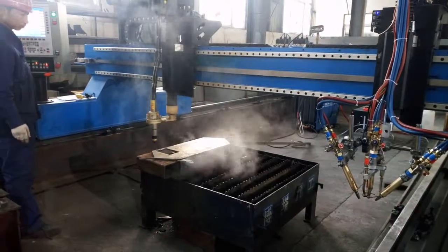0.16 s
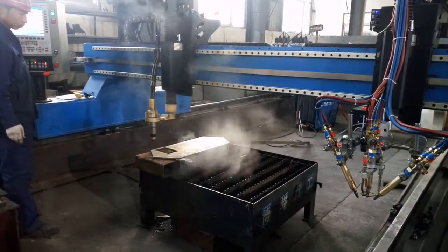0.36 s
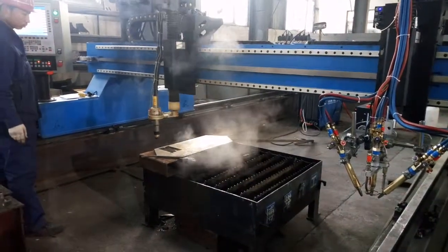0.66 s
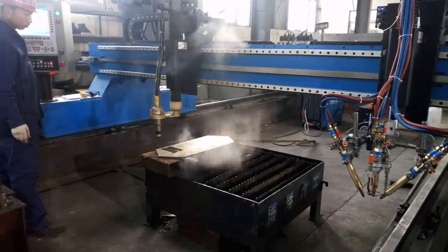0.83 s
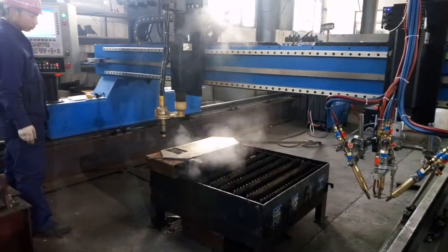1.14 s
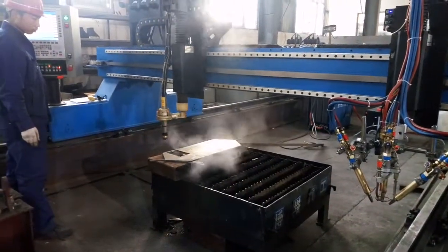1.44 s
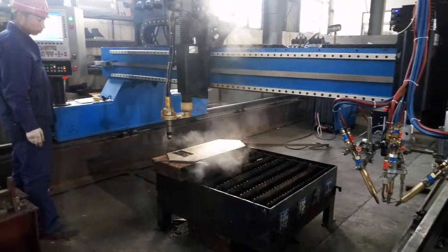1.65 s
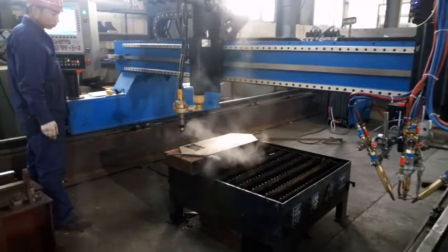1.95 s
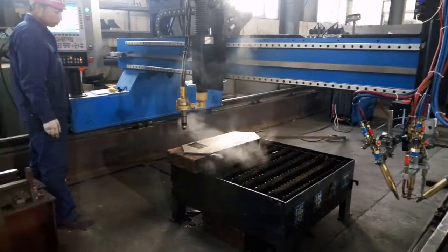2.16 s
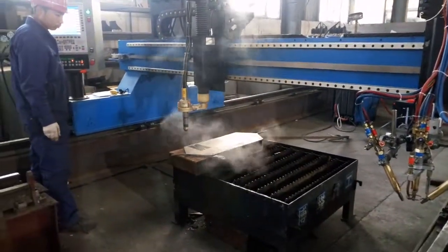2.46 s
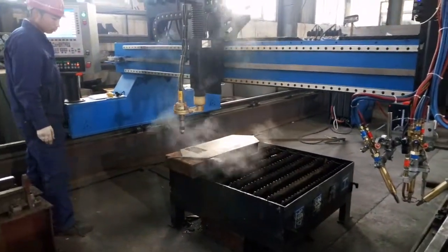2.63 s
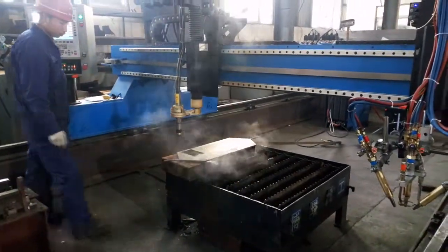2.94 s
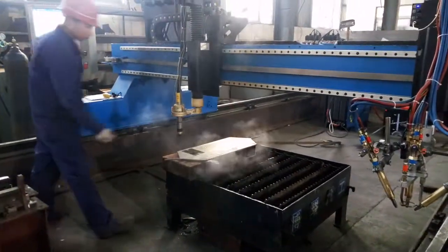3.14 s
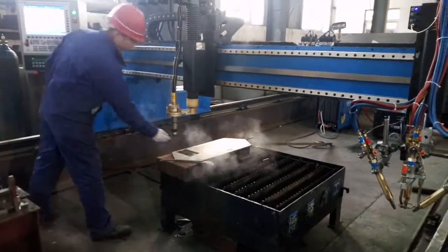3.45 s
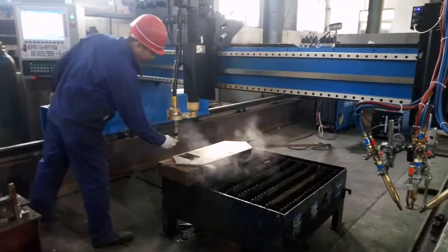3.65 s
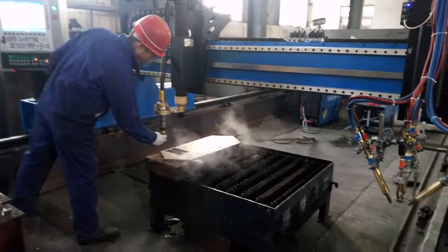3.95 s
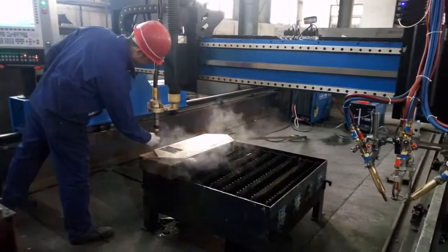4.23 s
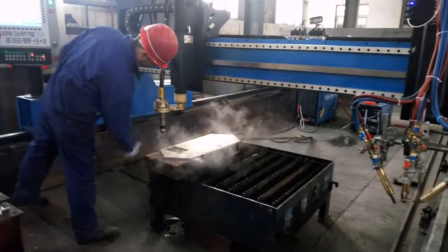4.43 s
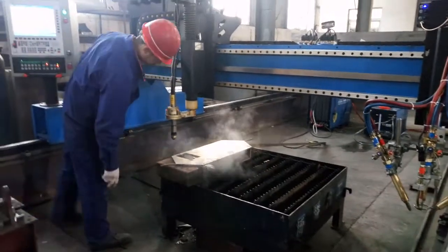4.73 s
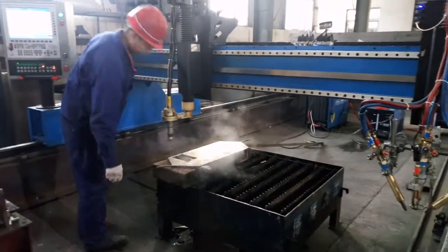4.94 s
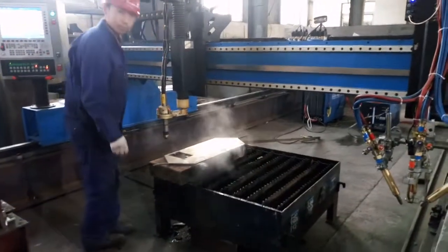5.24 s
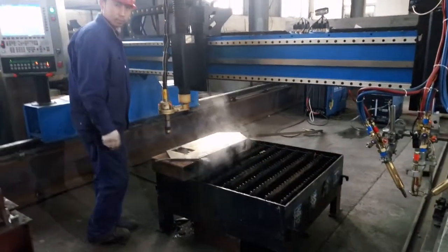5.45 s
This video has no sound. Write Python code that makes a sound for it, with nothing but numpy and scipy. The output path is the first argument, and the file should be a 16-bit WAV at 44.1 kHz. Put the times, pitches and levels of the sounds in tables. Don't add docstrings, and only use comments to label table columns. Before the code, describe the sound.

Harsh, high rushing jet over a metal plate fades out after four seconds, exposing a softer steady leak hiss and humming machinery.

```python
import sys
import numpy as np
from scipy import signal
from scipy.fft import rfft, irfft
from scipy.io import wavfile
from scipy.ndimage import map_coordinates

SR = 44100
rng = np.random.default_rng(int(sys.argv[2]) if len(sys.argv) > 2 else 0)


def dump(signal):
    limited = np.clip(np.atleast_2d(signal).T, -1, 1)
    pcm = np.round(limited * 32767).astype(np.int16)
    wavfile.write(sys.argv[1], SR, pcm)


def linear_from_db(decibels):
    return 10 ** (np.asarray(decibels, float) / 20)


N = 246517
T = np.arange(N) / SR
FRAME = 512
BAND_TOP_HZ, PATCH_OFFSET = 15510, 646
FULL_FLOW_DB = -11

# (time [s], level [dB])
GAS_FLOW = [(0, -14), (.3, -13), (.9, -13), (1.8, -12.5), (2.3, -12.5), (2.7, -12), (3.05, -13),
            (3.33, -12.5), (3.5, -17.5), (3.62, -20), (3.8, -22), (4, -19.5), (4.15, -25), (4.3, -40)]
# (frequency [Hz], level [dB])
JET_CORE_COLOUR = [(2500, -20), (3300, -25), (3750, -14), (4200, -6.5), (4600, -7.5), (4820, -9),
                   (5020, -3), (5700, 0.5), (6200, 1.5), (6480, 0), (6750, -8.5), (7300, -16),
                   (8150, -26.5), (9500, -50)]
# (frequency [Hz], level [dB])
JET_EDGE_COLOUR = [(6500, -7), (8200, -15), (8700, 2), (8900, -2), (9450, 0), (10100, -4), (11000, -4),
                   (12000, -5.5), (12900, -3), (13600, -4), (14200, 2.5), (14750, -7), (15250, 3.5),
                   (15600, -1)]
# (frequency [Hz], level [dB])
JET_ROAR_COLOUR = [(350, -5), (700, -4), (1200, -2), (1550, -3.5), (2250, 0.5), (2700, -3), (3300, 3.5),
                   (4000, -5), (4800, -35)]
# (frequency [Hz], level [dB])
LEAK_BODY_COLOUR = [(880, -18), (1500, -15.5), (1850, -12), (2040, -10), (2650, -11.5), (3530, -7),
                    (4100, -6.5), (4380, -4), (4790, -2.5), (6090, 4), (6570, -1), (8100, -22.5),
                    (9000, -27.5), (11700, -41), (19800, -120)]
# (frequency [Hz], level [dB])
LEAK_EDGE_COLOUR = [(4470, -40), (7600, -5.5), (8140, -12.5), (8980, -8), (11600, -12.5), (13000, -12),
                    (13600, -16), (15500, -15)]
# (time [s], rise of the top edge [dB])
LEAK_GUSTS = [
    (4.26, 3),
    (4.47, 1.5),
    (4.72, 3),
    (4.96, 6),
    (5.2, 2),
    (5.4, 4.5),
]
# (frequency [Hz], width [Hz], level [dB])
LEAK_WHISTLES = [(12550, 70, -65.5), (9700, 80, -73), (15050, 120, -75)]
# (start [s], length [s], level [dB], tilt [dB per octave])
FILE_STROKES = [
    (0.145, 0.27, -33, -6.5),
    (0.764, 0.27, -30.5, 4.5),
    (1.337, 0.26, -32, -2.5),
    (1.927, 0.32, -32.5, -3.5),
    (2.484, 0.23, -28.5, -4.5),
    (3.07, 0.3, -28, -4.5),
]
# (frequency [Hz], level [dB])
WORKPIECE_COLOUR = [(550, -28), (800, -6.5), (1050, -2), (1350, -4), (1550, -8), (1850, -6), (2300, -6.5),
                    (2750, -12), (3600, -17)]
# (time [s], level [dB], pitch [Hz])
SCUFFS = [
    (4.58, -31, 3300),
    (4.65, -37, 3300),
    (4.718, -36, 1900),
]
# (frequency [Hz], level [dB], wander [dB], wander rate [per s])
HUM_LINES = [(99.9, -57, 1.5, .5), (157.5, -51, 3, 1.5), (192.3, -44, 1.5, .6), (199.8, -30.5, .9, .8),
             (216.5, -43.5, 3.5, 3), (227.6, -36.5, 2.5, 2.5), (261.5, -46, 4, 4), (272, -48, 4, 4),
             (283.5, -48, 3.5, 2.5), (299.7, -48, 2, 1), (329, -51, 3, 2), (454.6, -46, 2.2, 1.2),
             (1134, -52, 3, 3)]
# (time [s], half length [s], rise [dB])
FAN_RISES = [
    (.56, 0.22, 10.5),
    (1.25, 0.3, 12),
    (1.93, .2, 8.5),
    (2.35, 0.08, 3),
    (2.93, 0.14, 10),
    (5.17, .15, 9.5),
]
# (frequency [Hz], level [dB])
RUMBLE_COLOUR = [(12, -57), (20, -22.5), (43, -27.5), (76, -31.5), (128, -17.5), (167, -12.5), (185, -10),
                 (204, -6), (255, -8), (382, -11.5), (596, -14.5), (659, -14), (744, -16), (1180, -16.5),
                 (2500, -27), (3250, -56), (5500, -120)]
# (time [s], half length [s], change [dB])
BASS_SWELLS = [
    (.85, 0.04, 2),
    (1.25, 0.38, 2),
    (1.85, 0.42, 1.5),
    (2.8, 0.28, -3),
    (3.7, 0.13, 4),
    (4.1, 0.074, 2.5),
]
# (delay [s], level [dB])
NEAR_ECHOES = [(.0013, -17), (.0021, -16), (.0037, -16), (.0059, -18), (.0083, -20)]
# (time [s], low edge [Hz], high edge [Hz])
SIDE_PATCHES = [(0.108, 4650, 6220), (0.317, 10290, 11760), (1.292, 5100, 10500), (1.385, 7710, 13160),
                (1.57, 4160, 5770), (1.594, 5120, 7670), (2.058, 4260, 6330), (2.058, 8940, 13180),
                (3.312, 6980, 13760), (3.846, 4590, 6290), (4.008, 5680, 6980), (4.635, 4180, 5750),
                (4.868, 4610, 9000), (5.518, 10420, 11690)]


def torch():
    core_db, = in_time(GAS_FLOW)
    lost_db = FULL_FLOW_DB - core_db
    shut = np.clip((4.3 - T) / 0.46, 0, 1)

    core = turbulence(JET_CORE_COLOUR, common_db=0.25, patchy_db=0.55, rate=10)
    core = lift(core, 2300, 5300, np.minimum(0.3 * lost_db, 7))

    edge_db = -25 + lingering(core_db, lag_s=0.11) - core_db
    edge = turbulence(JET_EDGE_COLOUR, common_db=-0.1, patchy_db=1.2, rate=9)
    edge = linear_from_db(edge_db) * shut ** 2.5 * edge
    beam_db = 1.5 - 1.1 * T - 0.3 * np.maximum(lost_db, 0)
    edge = lift(edge, 13000, 16000, beam_db)

    roar_db = -16 + lingering(core_db, lag_s=0.29) - core_db
    roar = linear_from_db(roar_db) * turbulence(JET_ROAR_COLOUR, common_db=0.2, patchy_db=0.55, rate=7)
    return shut * linear_from_db(core_db - 1.36) * (core + edge + roar)


def air_leak():
    gust_db = bumps([(s, 0.06, db) for s, db in LEAK_GUSTS])
    level_db = -25.5 + 0.17 * gust_db
    edge_db = -31 + gust_db
    hiss = turbulence(LEAK_BODY_COLOUR, common_db=0.25, patchy_db=0.5, rate=12)
    edge = linear_from_db(edge_db + 4.2) * turbulence(LEAK_EDGE_COLOUR, common_db=0.0, patchy_db=2.0, rate=14)
    out = linear_from_db(level_db) * (hiss + edge)
    for hz, width, db in LEAK_WHISTLES:
        band = [(hz - 3 * width, -25), (hz, 0), (hz + 3 * width, -25)]
        out += linear_from_db(db) * rms_one(colour(rng.standard_normal(N), band))
    return out


def knocks():
    t, out = np.arange(2048) / SR, np.zeros(N)
    for s, db, hz in SCUFFS:
        band = [(hz / 1.6, -14), (hz, 0), (hz * 1.6, -14)]
        burst = rms_one(colour(rng.standard_normal(2048), band))
        rise = np.clip(t / 0.004, 0, 1)
        fall_db = -60 * np.maximum(t - 0.014, 0) / 0.064
        out[round(s * SR):][:2048] += linear_from_db(db + fall_db) * rise * burst
    return out


def filing():
    out = np.zeros(N)
    for start, length, db, tilt_db in FILE_STROKES:
        rise = np.clip((T - start) / 0.016, 0, 1)
        tail_db = -60 * np.maximum(T - start - 0.7 * length, 0)
        rasp = rms_one(colour(rng.standard_normal(N), WORKPIECE_COLOUR, tilt_db))
        out += linear_from_db(db + tail_db) * rise * rasp
    return out


def slow_motors():
    load = 2 * np.pi * (T + 0.17) / 5.4
    level_db = -54 + 3.5 * np.cos(load)
    beat = 2 * np.cos(np.pi * 1.0 * (T - 0.22 + 0.069 * np.sin(load)))
    return np.sqrt(2) * linear_from_db(level_db) * beat * np.sin(2 * np.pi * 78.2 * T)


def machine_hum():
    out = slow_motors()
    fan_phase = 2 * np.pi * 375.7 * T + drift(1.7)[0]
    out += np.sqrt(2) * linear_from_db(-46.5 + bumps(FAN_RISES)) * np.sin(fan_phase)
    for hz, db, wander_db, rate in HUM_LINES:
        level, waver = drift(rate, count=2)
        phase = 2 * np.pi * hz * T + 0.4 * wander_db * waver + 7 * rng.random()
        out += np.sqrt(2) * linear_from_db(db + wander_db * level) * np.sin(phase)
    return out


def hall_rumble():
    rumble = turbulence(RUMBLE_COLOUR, common_db=0.2, patchy_db=0.5, rate=6)
    return linear_from_db(-30.5) * lift(rumble, 90, 520, 1.04 + bumps(BASS_SWELLS))


def near_echoes(x):
    at = np.arange(N)
    sway_s = 0.00015 * drift(0.52, count=len(NEAR_ECHOES))
    out = x.copy()
    for (delay_s, db), sway in zip(NEAR_ECHOES, sway_s):
        out += linear_from_db(db) * map_coordinates(x, [at - (delay_s + sway) * SR], order=3, mode="grid-wrap")
    return out * np.std(x) / np.std(out)


def turbulence(points, common_db, patchy_db, rate):
    hz, s, cells = signal.stft(rng.standard_normal(N), SR, nperseg=FRAME)
    zones = common_db * drift(rate) + patchy_db * drift(rate, count=8)
    place = np.interp(np.log(hz + 1), np.log([points[0][0], points[-1][0]]), [0, 7])
    grid = np.meshgrid(place, np.minimum(s * SR, N - 1), indexing="ij")
    cells = cells * linear_from_db(map_coordinates(zones, grid, order=1))
    noise = signal.istft(cells, SR, nperseg=FRAME)[1][:N]
    return rms_one(colour(noise, points))


def colour(x, points, tilt_db=0):
    hz = np.maximum(np.fft.rfftfreq(len(x), 1 / SR), 1)
    at, level_db = np.transpose(points)
    gain_db = np.interp(np.log(hz), np.log(at), level_db, -150, -150)
    gain_db = gain_db + tilt_db * np.log2(hz / 1200)
    return irfft(rfft(x) * linear_from_db(gain_db), len(x))


def lift(x, low_hz, high_hz, gain_db):
    return x + (linear_from_db(gain_db) - 1) * colour(x, [(low_hz, 0), (high_hz, 0)])


def lingering(level_db, lag_s):
    r, power = np.exp(-1 / (lag_s * SR)), linear_from_db(2 * level_db)
    held = signal.lfilter([1 - r], [1, -r], power, zi=[r * linear_from_db(2 * FULL_FLOW_DB)])[0]
    return 10 * np.log10(held)


def bumps(rows):
    t = np.arange(0, N + 64, 64) / SR
    total_db = sum(db * np.exp(-((t - s) / half_s) ** 2) for s, half_s, db in rows)
    return np.interp(T, t, total_db)


def drift(rate, count=1):
    r = np.exp(-128 * np.pi * rate / SR)
    noise = rng.standard_normal((count, N // 64 + 1502))
    slow = signal.lfilter([1], [1, -2 * r, r * r], noise)[:, 1500:]
    slow -= slow.mean(axis=1, keepdims=True)
    return np.array([np.interp(np.arange(N) / 64, np.arange(len(s)), rms_one(s)) for s in slow])


def in_time(rows):
    s, *columns = np.transpose(rows)
    return [np.interp(T, s, c) for c in columns]


def rms_one(x):
    return x / np.sqrt(np.mean(x ** 2) + 1e-20)


def band_patch(x, at, band):
    window = signal.windows.cosine(4 * FRAME)
    first, second = (window * colour(x[at:at + 4 * FRAME], band)).reshape(2, -1)
    return window * np.concatenate([first - first[::-1], second + second[::-1]])


def scene():
    hisses = near_echoes(torch() + air_leak())
    mono = hisses + hall_rumble() + machine_hum() + filing() + knocks()
    return np.array([mono, mono])


def band_limit(x):
    return signal.sosfilt(signal.butter(12, 16470, fs=SR, output="sos"), x)


def record(dry):
    mid = colour(1.27 * np.tanh(dry[0] / 1.139), [(1, 0), (BAND_TOP_HZ, 0)])
    side = np.zeros(N)
    hop, half_power = 2 * FRAME, np.sqrt(0.5)
    for s, low_hz, high_hz in SIDE_PATCHES:
        at = PATCH_OFFSET + hop * (round((s * SR - PATCH_OFFSET) / hop) - 1)
        band = [(low_hz, 0), (high_hz, 0)]
        side[at:at + 4 * FRAME] += half_power * band_patch(mid, at - 3 * FRAME, band)
        mid[at:at + 4 * FRAME] -= (1 - half_power) * band_patch(mid, at, band)
    return band_limit(np.array([mid + side, mid - side]))


dry = scene()
out = record(dry)
dump(out)
```